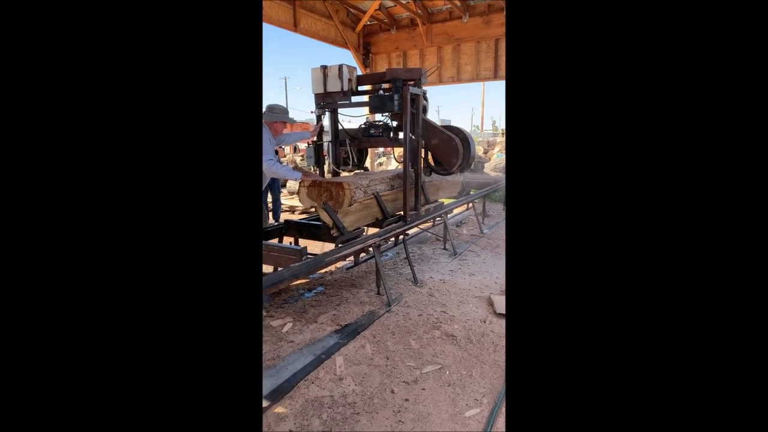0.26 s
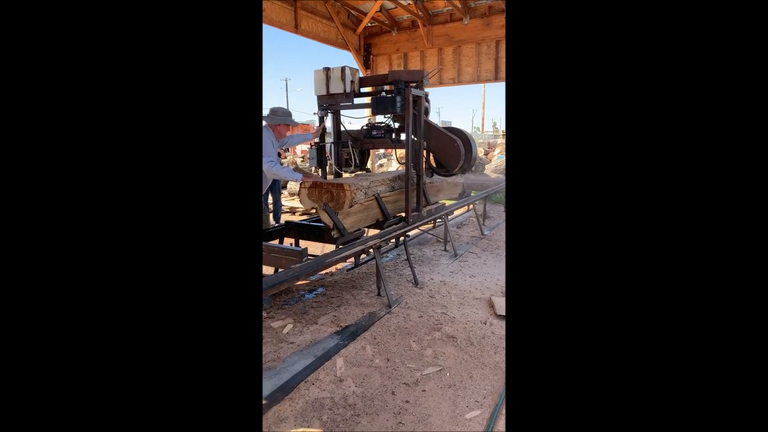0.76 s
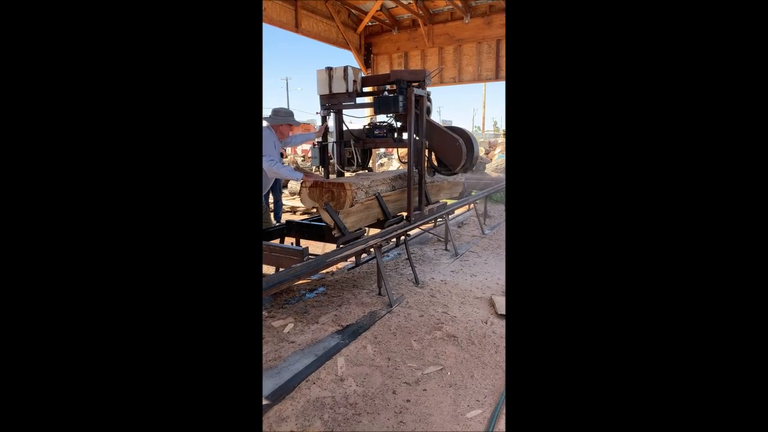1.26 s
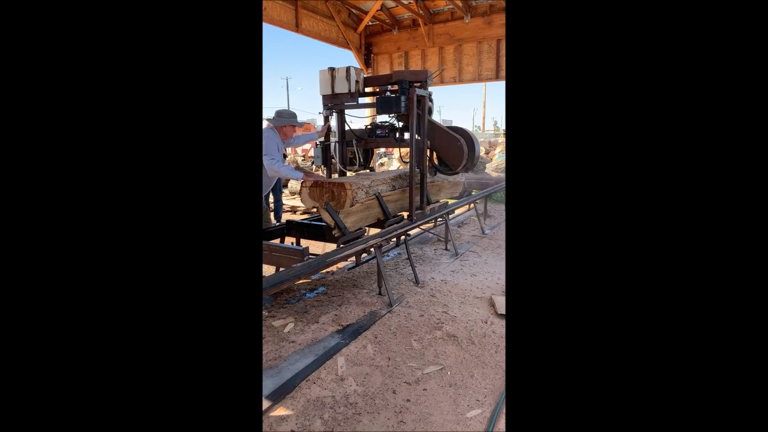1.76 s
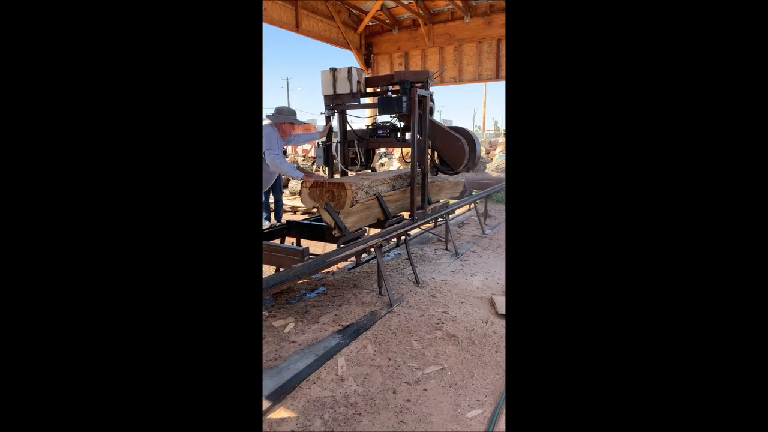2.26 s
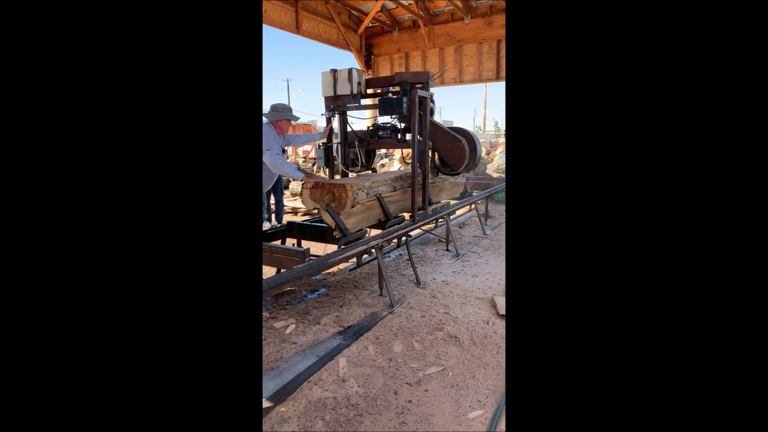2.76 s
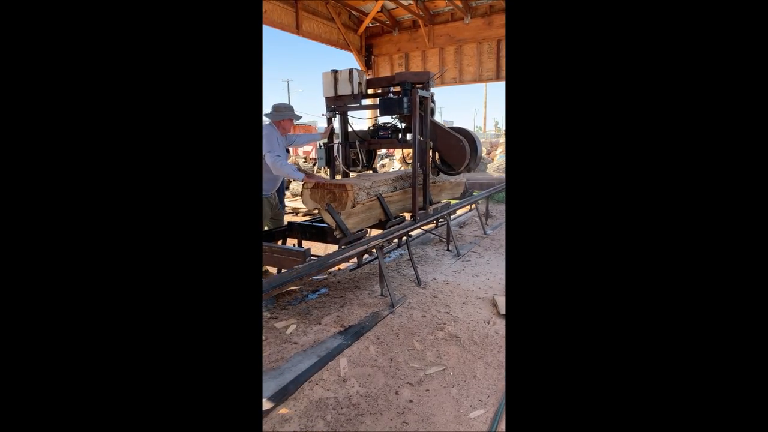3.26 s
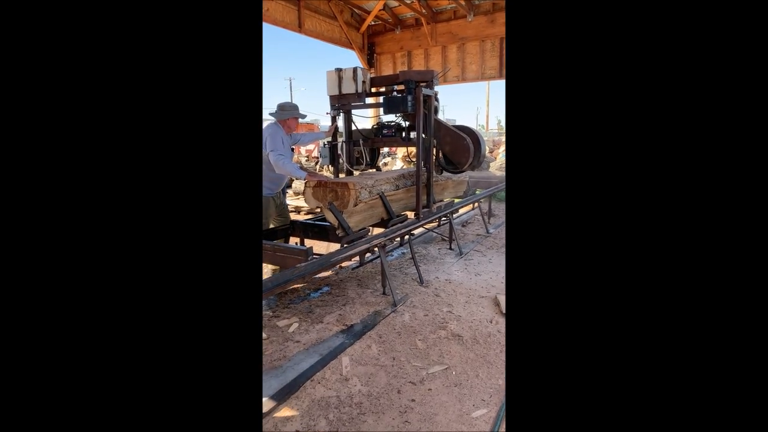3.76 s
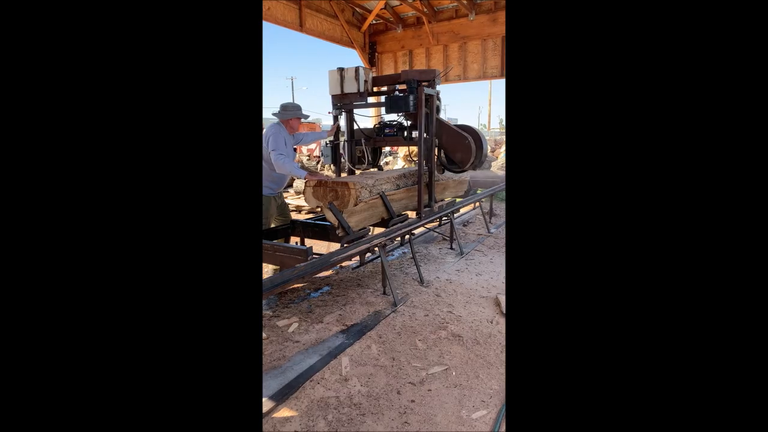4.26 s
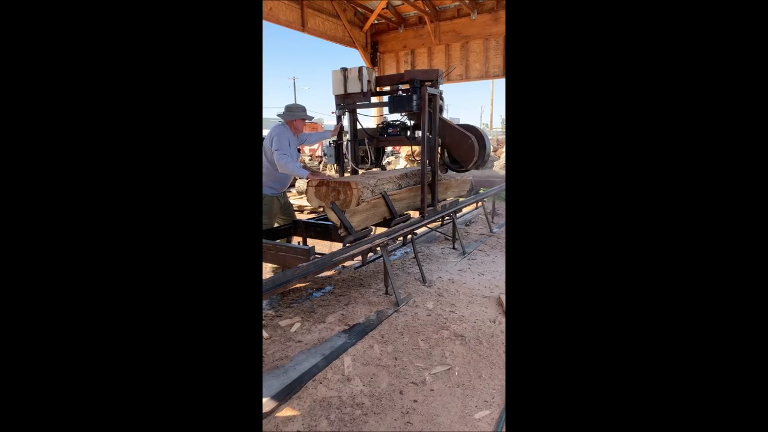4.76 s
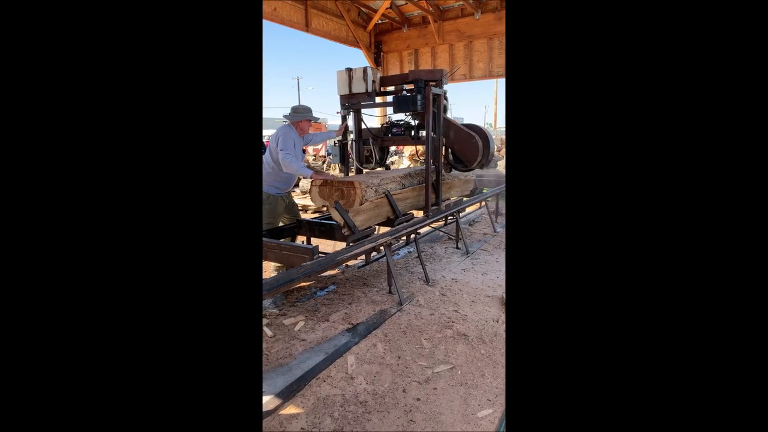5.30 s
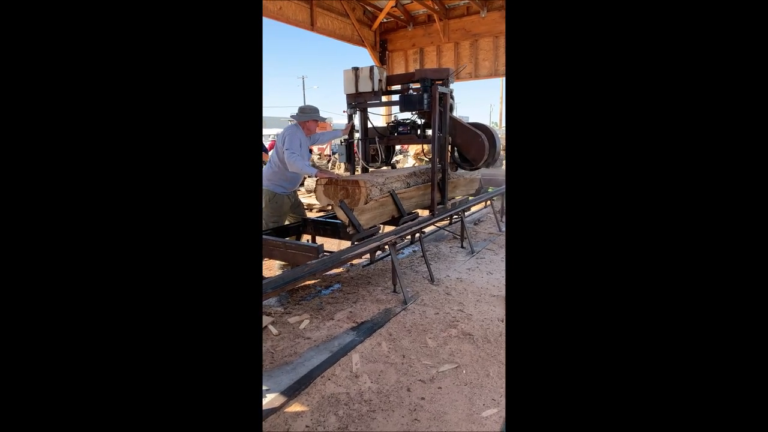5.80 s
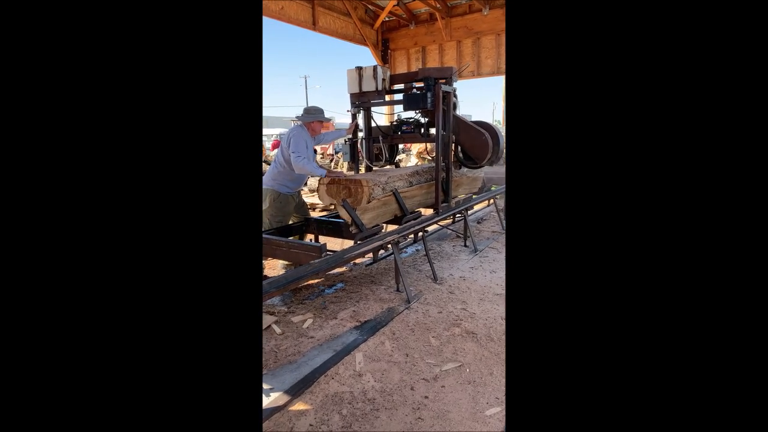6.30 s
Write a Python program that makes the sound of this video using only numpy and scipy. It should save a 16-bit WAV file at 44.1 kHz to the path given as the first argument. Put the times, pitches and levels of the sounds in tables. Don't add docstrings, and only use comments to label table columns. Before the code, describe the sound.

A small petrol engine hums and roars close by, its pitch sagging and recovering, while a band blade hisses brightly through a log.

```python
import sys
import numpy as np
from scipy import signal
from scipy.fft import rfft, irfft
from scipy.io import wavfile
from scipy.ndimage import uniform_filter1d

SR = 44100
rng = np.random.default_rng(int(sys.argv[2]) if len(sys.argv) > 2 else 0)


def generate_wav(sig):
    pcm = np.round(np.clip(np.atleast_2d(sig).T, -1, 1) * 32767).astype(np.int16)
    wavfile.write(sys.argv[1], SR, pcm)


def nominal_scale(level):
    x = np.asarray(level, float) / 20
    return 10 ** x


N = 288414

# (time [s], speed [cycles/s])
ENGINE_SPEED = [(0, 27.65), (.62, 27.8), (.98, 27.25), (1.2, 27.55), (1.55, 26.7), (1.85, 26.45),
                (2.08, 25.7), (2.3, 26.3), (2.55, 29.4), (2.75, 29.72), (3.2, 29.75), (3.5, 26.75),
                (3.8, 26.45), (4.52, 28.05), (4.97, 27.3), (5.68, 28.2), (6.12, 26.6), (6.54, 26.3)]
# (time [s], level [dB])
BITE_LEVEL = [(0.0, -26.5), (0.07, -29), (0.16, -28.5), (1.89, -30), (2.26, -30.5), (2.29, -26),
              (2.35, -30.5), (2.79, -35), (3.19, -35), (3.28, -28.5), (3.35, -31.5), (3.52, -29.5),
              (4.77, -31), (6.54, -30.5)]
# (time [s], peak level [dB])
CHIP_HITS = [(0.6794, -33), (1.2291, -17), (2.1694, -2), (2.4704, -25), (2.9894, -6), (3.2608, -19),
             (3.4991, -25), (3.8394, -7), (3.9797, -7), (4.0994, -10), (4.2446, -5), (4.8419, -18),
             (5.0427, -16), (5.7897, -20), (6.239, -19)]
# (order [per cycle], level at usual speed [dB], slope [dB/Hz], bend [dB/Hz^2],
# change as the carriage travels [dB/s])
EXHAUST_ORDERS = [(1, -56.1, -4, -4, -0.2), (1.9, -41.3, -1.7, 0.7, 0.3), (3, -32.5, -1.6, -0.0, 0.3),
                  (4.1, -59, 3.5, 1.6, -0.5), (4.97, -26, -1.1, -0.48, 0.2), (6, -31.5, 1.8, -1.5, 0.2),
                  (7, -43, -4, -3.5, 0.0), (8.3, -38.5, 2, -0.5, -0.3), (8.95, -33.5, 0, -0.72, 0.05),
                  (10.3, -31, -0.6, -0.26, 0.75), (11, -35, -0.1, -1.1, 0.4), (12, -35.5, -1.5, -1.9, 0.1),
                  (13, -41, -2.5, -0.5, -0.3), (14, -57, -2, 0.8, 2), (15, -41, -1.1, -2.5, 0.8),
                  (16, -57, 2.5, -0.5, -1), (17, -50, -1.1, -0.3, 2), (18, -49.5, -0.4, -1.5, -2.5),
                  (19, -47.5, -1.5, -1.7, 1.5), (25, -53.5, 2.5, 1, 2.5)]
# (frequency [Hz], width [Hz], level [dB])
SHED_ECHOES = [(83.1, 3, -6), (135.8, 4.8, -5), (155.6, 6.3, -18), (217.8, 5.4, -13), (244, 7.7, -12.5),
               (269, 4.8, 2.5), (336, 8.4, -6.5)]
# (frequency [Hz], density [dB/Hz])
ROAR_COLOUR = [(20, -28), (40, -6), (65, -10), (110, -5.5), (200, -5.5), (280, -4), (350, -2), (500, -5.5),
               (800, -7.5), (1150, -9.5), (1800, -11), (2600, -15.5), (4000, -16), (8000, -29)]
# (frequency [Hz], width [Hz], level [dB])
COVER_MODES = [(334.4, 25, 4.5), (352.4, 13.4, 5.5), (685.6, 20, 6), (904, 85, 3), (1306, 113, 6.5),
               (1960, 53, 0), (2810, 16, 8)]
# (frequency [Hz], likeness [0..1])
ROAR_LIKENESS = [(40, 0.65), (100, 0.61), (300, 0.77), (640, 0.73), (1000, 0.8), (1400, 0.78), (2300, 0.33),
                 (4000, 0.69)]
# (frequency [Hz], phase [rad])
ROAR_PHASE = [(60, 0.), (300, -.05), (1000, .35), (1350, -.4), (2000, .45), (2900, 2.2)]
# (frequency [Hz], level [dB])
ROAR_BALANCE = [(40, -1.), (130, -2.5), (300, -4), (700, -2), (1200, -0.5), (2300, -2.5), (4000, 1.5)]
# (frequency [Hz], density [dB/Hz])
HISS_COLOUR = [(800, -26), (2000, -8), (3100, -7.5), (3700, -6.5), (4500, -6), (5300, -3.5), (7400, -0.5),
               (7900, -2), (9000, -1), (10500, -1), (11500, -6.5), (13500, -9.5), (14600, -6),
               (15700, -11.5)]
# (frequency [Hz], width [Hz], level [dB])
BLADE_MODES = [(4830, 300, 4), (5120, 250, 2), (5480, 150, 2), (6200, 300, 1.5), (8370, 350, 3),
               (9700, 350, 2), (12600, 700, 3), (14000, 500, 2), (15100, 400, 1.5)]
# (frequency [Hz], likeness [0..1])
HISS_LIKENESS = [(2500, 0.2), (3800, 0.54), (4250, 0.96), (4600, 1), (6700, 0.82), (9000, 0.92), (11200, 1),
                 (12600, 1), (13400, 1), (14200, .85), (15300, .95)]
# (frequency [Hz], width [Hz], level [dB])
GUIDE_RINGS = [(6560, 1100, -44), (8600, 500, -48), (9550, 220, -41), (12900, 600, -47)]


def evened(x):
    return x / np.sqrt(np.mean(x ** 2) + 1e-20)


def read(points, hz):
    f, value = np.transpose(points)
    return np.interp(np.log(hz + 1), np.log(f + 1), value)


def over_time(rows):
    s, value = np.transpose(rows)
    return np.interp(np.arange(N) / SR, s, value)


def wander(hz, count=1):
    spectrum = rfft(rng.standard_normal((count, N)))
    slow = np.exp(-(np.fft.rfftfreq(N, 1 / SR) / hz) ** 2)
    return evened(irfft(spectrum * slow, N))


def humps(modes, hz):
    return sum(db / (1 + (2 * (hz - f) / width) ** 2) for f, width, db in modes)


def port_noise(shape, patchy_db, size):
    frames, hz = 4 * N // size + 5, np.fft.rfftfreq(size, 1 / SR)
    a, b, c, d, patches = rng.standard_normal((frames, len(hz), 5)).T
    patches = uniform_filter1d(patches, size=size // 128, axis=0)
    patches = evened(uniform_filter1d(patches, size=4096 // size, axis=1))
    colour_db, same, lead, lean_db = (np.reshape(v, (-1, 1)) for v in shape(hz))
    same = np.clip(same, -1, 1)
    right = a + 1j * b
    left = same * right * np.exp(1j * lead) + np.sqrt(1 - same ** 2) * (c + 1j * d)
    ports = np.array([left * nominal_scale(lean_db / 2), right * nominal_scale(-lean_db / 2)])
    ports = ports * nominal_scale(colour_db + patchy_db * patches)
    return evened(signal.istft(ports, nperseg=size, noverlap=3 * size // 4)[1][:, :N])


def port_lead(hz):
    return 2 * np.pi * hz / 4407 - 3.314


def firing(cycle, sharp, second_at, second):
    first_puff = np.exp(-(cycle % 1) / sharp)
    second_puff = np.exp(-((cycle - second_at) % 1) / sharp)
    return first_puff + second * second_puff


def exhaust(rate, cycle, bite_db):
    usual_hz, midway_s = 27.5, 3.27
    governor_size = int(0.17 * SR)
    pull_db, drop_db = 0.22, 0.8
    faster, travel = rate - usual_hz, np.arange(N) / SR - midway_s
    gaining = np.gradient(uniform_filter1d(rate, size=governor_size)) * SR
    pull = np.where(gaining > 0, pull_db, drop_db) * gaining
    load_db = 0.18 * uniform_filter1d(bite_db - bite_db.mean(), size=governor_size)
    count = len(EXHAUST_ORDERS)
    rough, start = wander(25, count=count), rng.standard_normal(count)
    drift = wander(1.7, count=count)
    out = np.zeros((2, N))
    for k, (order, db, slope, bend, moving) in enumerate(EXHAUST_ORDERS):
        level_db = db + slope * faster + bend * faster ** 2 + moving * travel
        level_db = level_db + humps(SHED_ECHOES, round(order) * rate) + load_db
        level_db = level_db + pull * np.clip((order - 7.6) / 3, 0, 1)
        lag = 12 * max(1 / order - 1 / 5, 0)
        lag += start[k] * np.clip((order / 8.5) ** 6, .2, 3)
        turn = 2 * np.pi * round(order) * cycle + lag + .12 * drift[k]
        order_hz = rate.mean() * order
        lean_db, ahead = read(ROAR_BALANCE, order_hz), read(ROAR_PHASE, order_hz)
        sides_db = level_db + 0.5 * rough[k] + np.array([[lean_db / 2], [-lean_db / 2]])
        out += np.sqrt(2) * nominal_scale(sides_db) * np.cos(turn + np.array([[ahead], [0]]))
    return out


def casing(cycle, bite_db, sway):
    def shape(hz):
        colour_db = read(ROAR_COLOUR, hz) + humps(COVER_MODES, hz)
        return colour_db, read(ROAR_LIKENESS, hz), read(ROAR_PHASE, hz), read(ROAR_BALANCE, hz)

    roar_db = -27 + 0.26 * (bite_db - bite_db.mean()) + 0.61 * sway
    shake = evened(1 + 0.067 * firing(cycle, sharp=0.6, second_at=0.22, second=0.59))
    return nominal_scale(roar_db) * shake * port_noise(shape, patchy_db=1.25, size=2048)


def guides():
    out = np.zeros((2, N))
    for ring_hz, width, db in GUIDE_RINGS:
        def shape(hz):
            colour_db = np.maximum(-24 * ((hz - ring_hz) / width) ** 2, -80)
            return colour_db, .95 + 0 * hz, port_lead(hz), 0 * hz

        bursts = evened(nominal_scale(4.5 * wander(40)[0]))
        out += nominal_scale(db) * bursts * port_noise(shape, patchy_db=0, size=512)
    return out


def chip_bursts():
    t, bursts = np.arange(N) / SR, np.zeros(N)
    for s, db in CHIP_HITS:
        bursts += nominal_scale(db - 22.5) * np.exp(-((t - s - .003) / 0.0029) ** 2)
    return bursts


def blade(cycle, bite_db):
    def shape(hz):
        colour_db = read(HISS_COLOUR, hz) + humps(BLADE_MODES, hz)
        return colour_db, read(HISS_LIKENESS, hz), port_lead(hz), 0 * hz

    throb = evened(1 + 0.86 * firing(cycle, sharp=0.037, second_at=.375, second=0.32))
    flicker_db = 0.19 * wander(30)[0] + 0.31 * wander(70)[0] + 0.49 * wander(400)[0]
    hiss = port_noise(shape, patchy_db=1.5, size=512)
    high_pass = signal.firwin(101, 10800, pass_zero=False, fs=SR)
    top = signal.oaconvolve(hiss, high_pass[None], "same")
    hiss = hiss + top * (nominal_scale(0.34 * (bite_db - bite_db.mean())) - 1)
    return (nominal_scale(bite_db + 4 + flicker_db) * throb + chip_bursts()) * hiss


def scene():
    rate = uniform_filter1d(over_time(ENGINE_SPEED), size=3000)
    bite_db = over_time(BITE_LEVEL)
    cycle = np.cumsum(rate) / SR
    grain, sway = wander(24, count=2)
    engine = exhaust(rate, cycle, bite_db) + casing(cycle, bite_db, sway)
    knotty_bite_db = bite_db + 0.35 * grain
    return engine + guides() + blade(cycle, knotty_bite_db)


def top_cut(x):
    return signal.sosfilt(signal.butter(12, 16240, fs=SR, output="sos"), x)


def record(dry):
    edge = signal.firwin(1023, 15740, window=("kaiser", 9), fs=SR)
    mix = signal.oaconvolve(dry, edge[None], "same")
    return top_cut(mix)


dry = scene()
out = record(dry)
generate_wav(out)
```